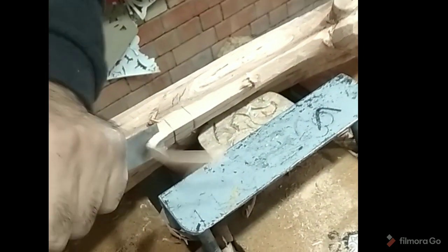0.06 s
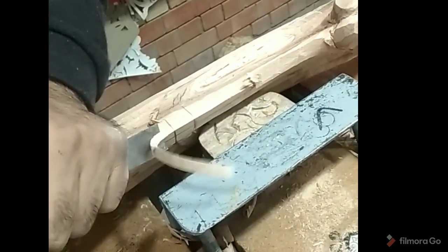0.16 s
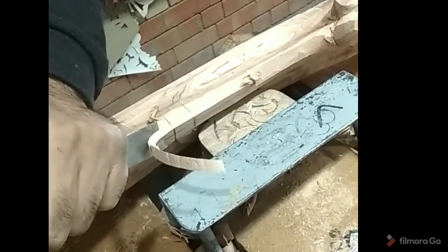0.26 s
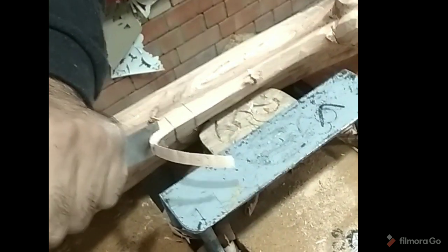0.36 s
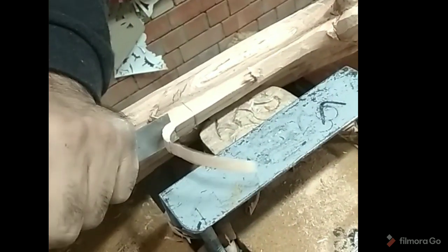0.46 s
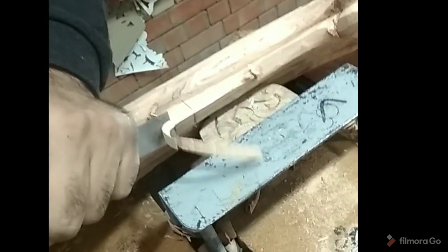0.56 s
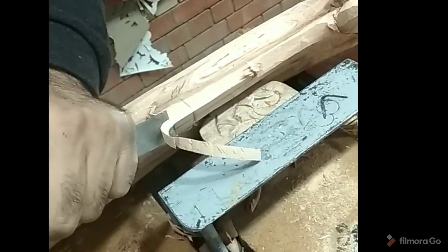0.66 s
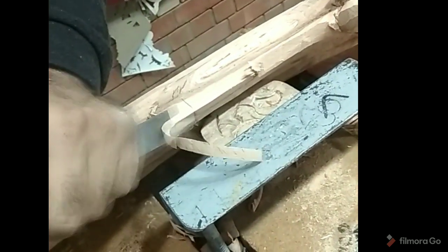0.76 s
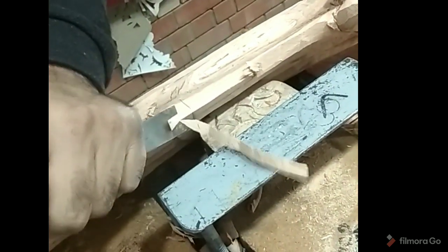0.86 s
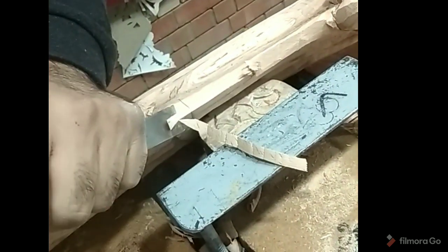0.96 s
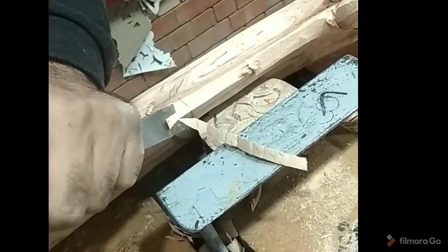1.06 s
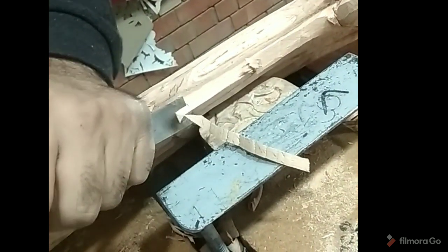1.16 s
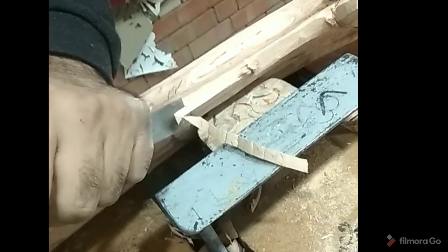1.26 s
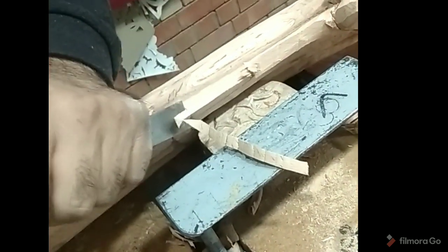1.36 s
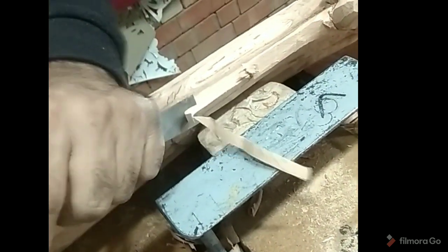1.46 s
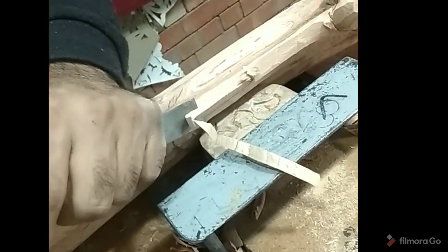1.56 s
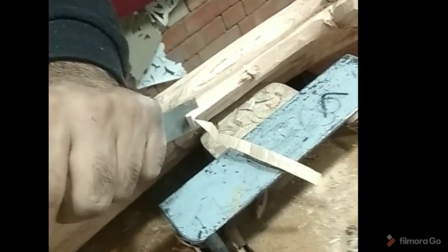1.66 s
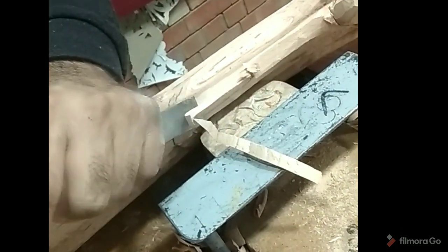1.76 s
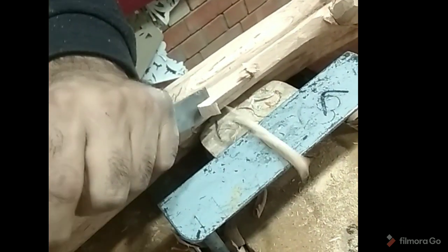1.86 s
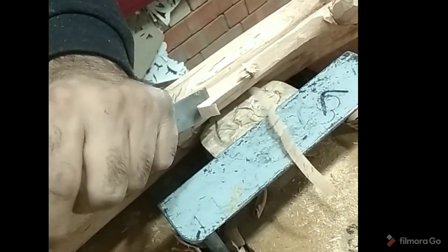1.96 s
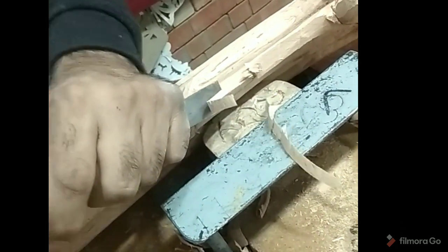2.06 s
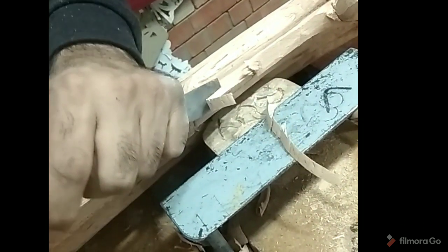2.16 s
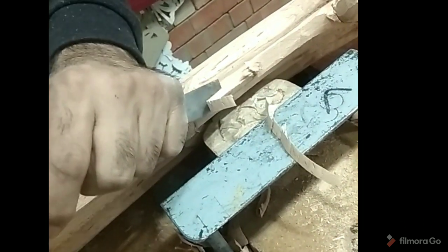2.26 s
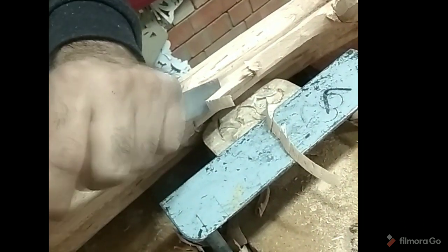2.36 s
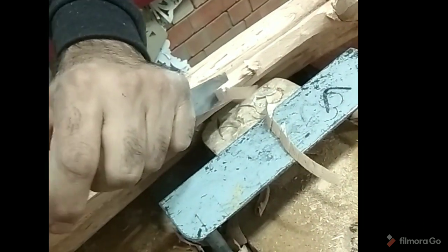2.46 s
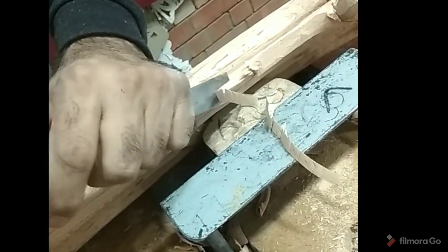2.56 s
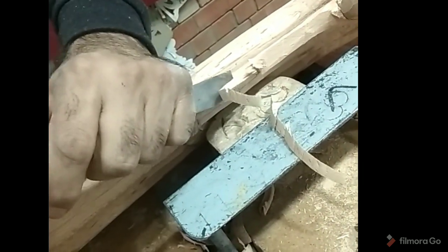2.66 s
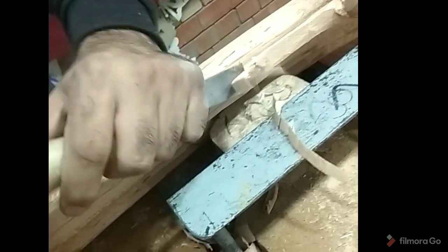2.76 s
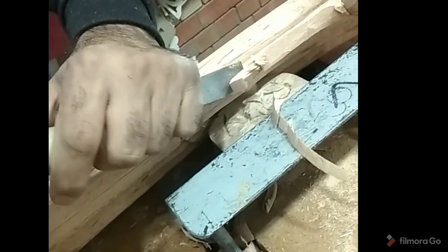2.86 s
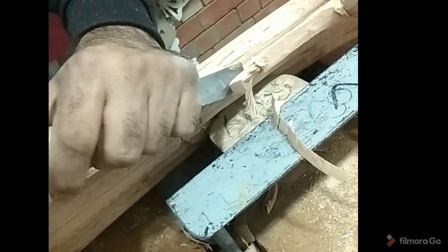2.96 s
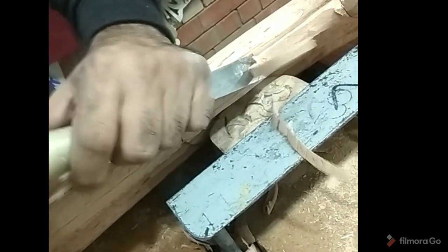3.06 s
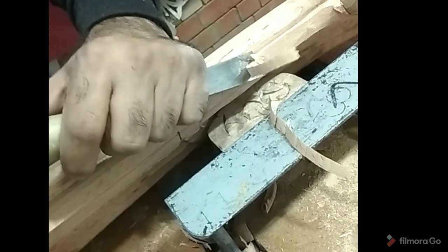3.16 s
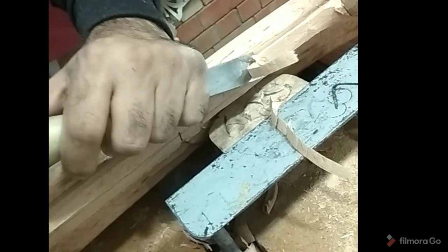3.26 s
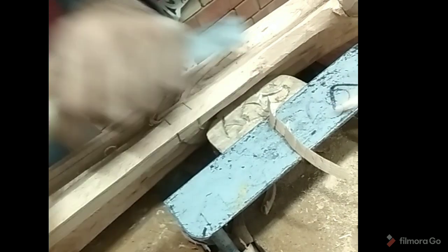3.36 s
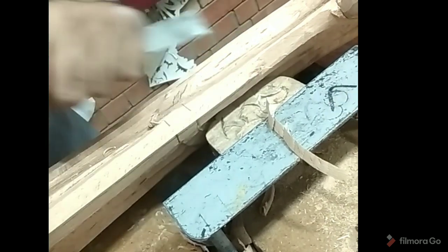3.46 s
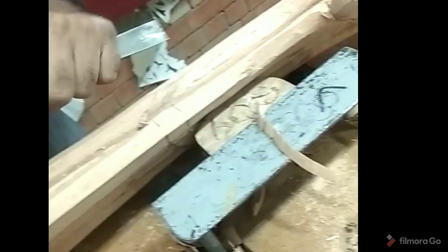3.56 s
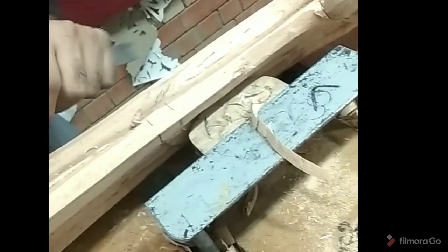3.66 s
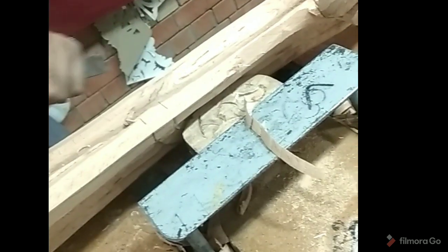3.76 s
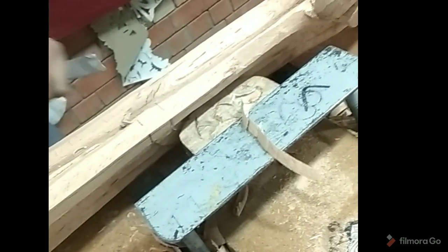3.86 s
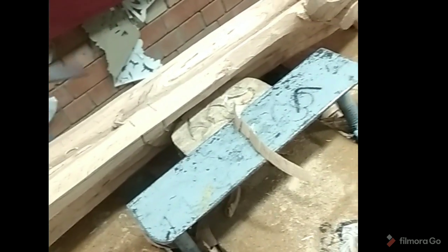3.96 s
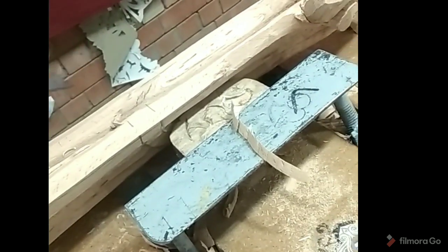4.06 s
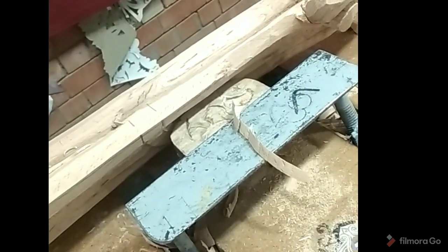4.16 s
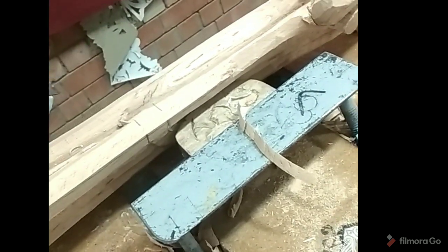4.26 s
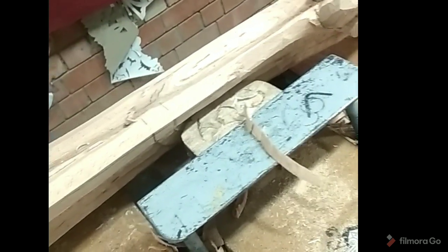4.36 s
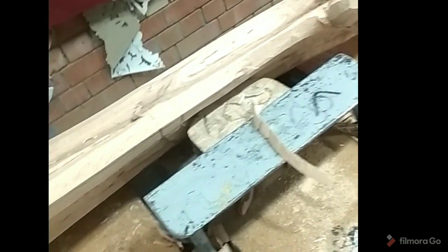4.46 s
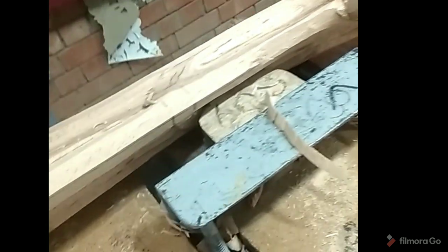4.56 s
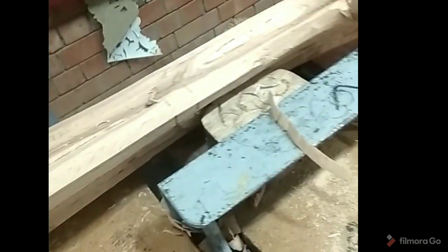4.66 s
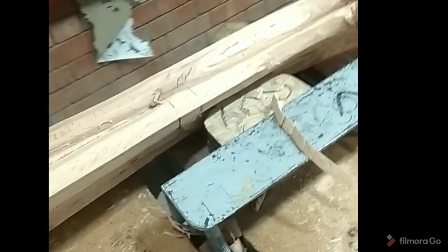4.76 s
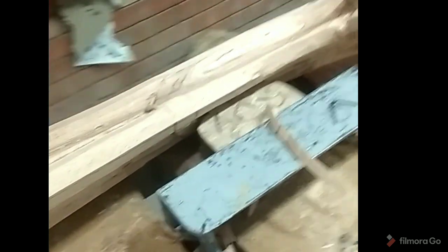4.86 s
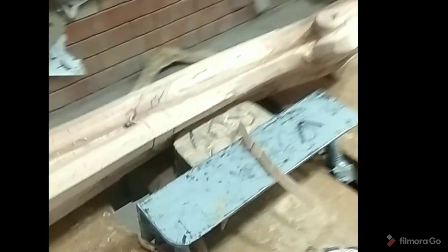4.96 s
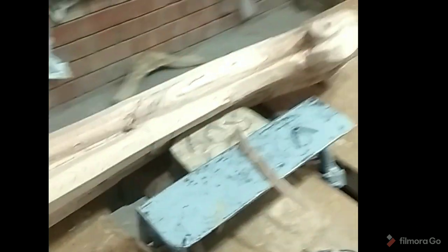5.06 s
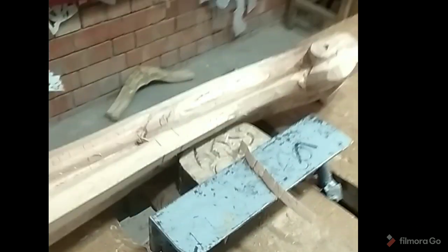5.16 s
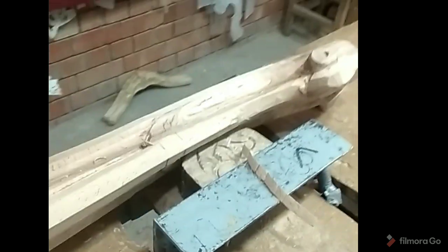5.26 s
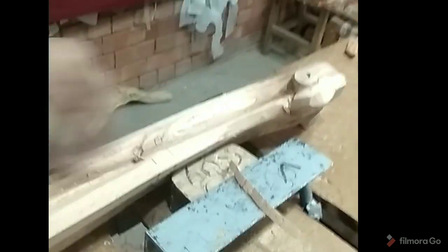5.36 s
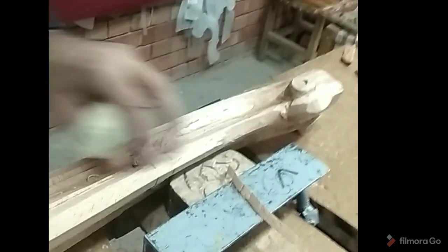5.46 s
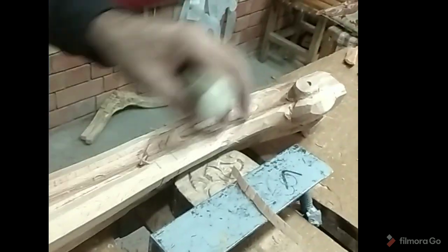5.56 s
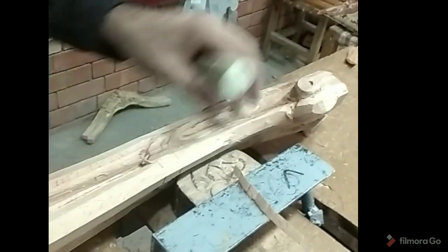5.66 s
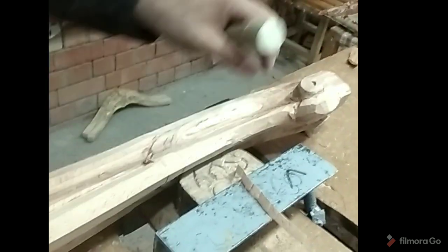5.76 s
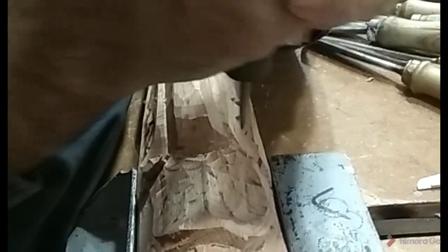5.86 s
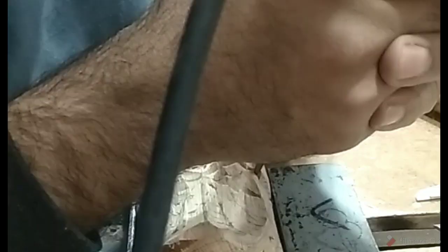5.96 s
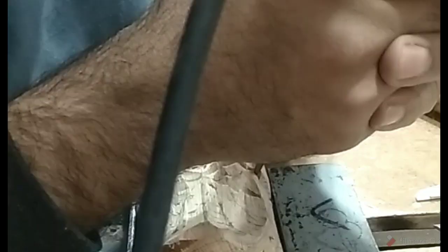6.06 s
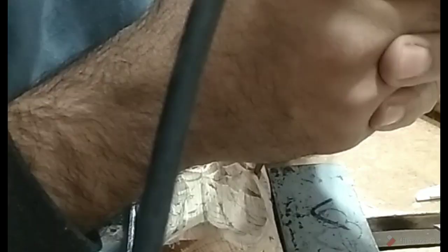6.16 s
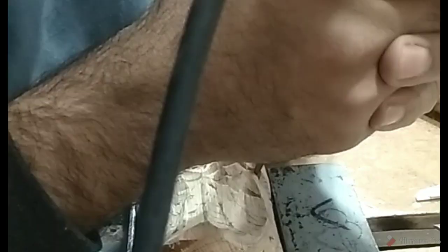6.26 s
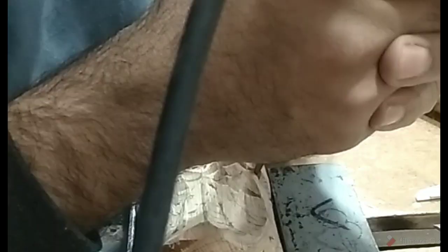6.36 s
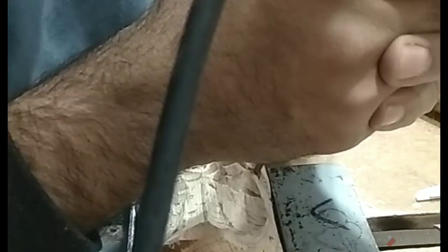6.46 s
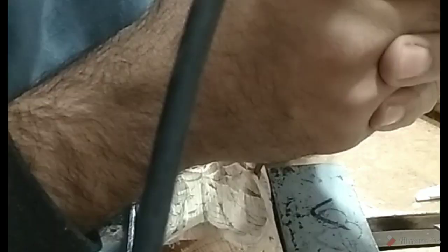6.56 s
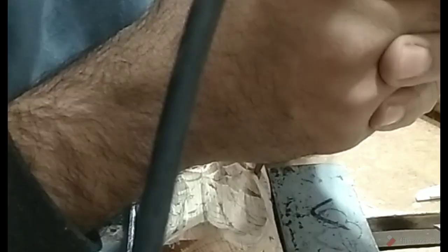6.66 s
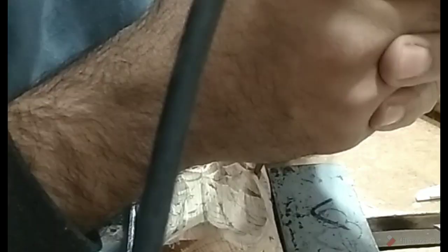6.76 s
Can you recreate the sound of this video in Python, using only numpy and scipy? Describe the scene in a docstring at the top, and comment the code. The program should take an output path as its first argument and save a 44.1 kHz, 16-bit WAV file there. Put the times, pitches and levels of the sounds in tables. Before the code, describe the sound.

Steady woody cracks of mallet on gouge, slowly softening, then quiet handling, a blink of silence, and a hissing, whining rotary tool, left side only.

```python
"""Mallet and gouge, then rotary tool

A mallet drives a gouge along a log: each blow is a burst of decaying log and bench modes, a singing blade,
splintery noise and tearing. Rebounds, bumps, chips, shuffling and cloth surround the blows, over rumble,
hum and hiss. After a short silence a second shot has a rotary tool fading in: shaped noise plus thin tones.
All this is on the left microphone input; the right one holds faint hiss."""
import sys
import numpy as np
from scipy import signal
from scipy.fft import rfft, irfft, next_fast_len
from scipy.io import wavfile
from scipy.ndimage import uniform_filter1d, map_coordinates

SR = 44100
rng = np.random.default_rng(int(sys.argv[2]) if len(sys.argv) > 2 else 0)


def unload_wav(signal):
    """Save mono or channel-first audio to the path in sys.argv[1] as 16-bit WAV at rate SR, clipped to [-1, 1]."""
    wavfile.write(
        sys.argv[1],
        SR,
        np.round(np.clip(np.atleast_2d(signal).T, -1, 1) * 32767).astype(np.int16),
    )


def volts_from_decibels(level):
    """Turn decibel levels (scalar or array-like) into linear amplitude factors."""
    exponent = np.asarray(level, float) / 20
    return 10 ** exponent


N = 300321

# wood fibres tearing, relative spectrum: f/Hz, level/dB
TEAR_SPECTRUM = [(1470, -25.5), (2500, 3), (4550, 0), (7190, -8), (8140, 0.5), (9730, -4), (11400, 0),
                 (16000, -12.5)]
# silence between the two shots: start/s, end/s
GAP_S = (5.872, 5.908)


def unit(x):
    """Scale to rms 1."""
    return x / np.sqrt(np.mean(x ** 2) + 1e-20)


def along(points, hz):
    """Interpolate (f/Hz, value) points on a log frequency axis."""
    f, v = np.transpose(points)
    return np.interp(np.log(hz + 1), np.log(f + 1), v)


def curves(rows):
    """One value per sample for each column after the time."""
    s, *cols = np.transpose(rows)
    return [np.interp(np.arange(N) / SR, s, c) for c in cols]


def wobble(rate_hz):
    """Smooth random curve through rate_hz random knots a second."""
    knots = rng.standard_normal(int(N * rate_hz / SR) + 4)
    return map_coordinates(knots, [np.arange(N) * rate_hz / SR])


def filtered(x, response):
    """Multiply the spectrum of x by a response of frequency."""
    m = next_fast_len(len(x) + 8192)
    return irfft(rfft(x, m) * response(np.fft.rfftfreq(m, 1 / SR)), m)[:len(x)]


def noise(spectrum, size=N, patchy_db=0):
    """Coloured noise of rms 1 with time-frequency patches of random gain."""
    z = signal.stft(rng.standard_normal(size), nperseg=512)[2]
    field = uniform_filter1d(rng.standard_normal(z.shape), size=5, axis=0)
    field = uniform_filter1d(field, size=16, axis=1)
    x = signal.istft(z * volts_from_decibels(patchy_db * unit(field)), nperseg=512)[1][:size]
    return unit(filtered(x, lambda hz: volts_from_decibels(along(spectrum, hz))))


def add(out, s, x):
    """Mix x into out from time s."""
    out[round(s * SR):][:len(x)] += x


def room_hiss():
    """Faint, nearly even noise under the first shot."""
    # relative spectrum: f/Hz, level/dB
    air = [(1500, -44.5), (2500, -4.5), (5000, 0), (10000, -5), (13000, -14), (16000, -25.5)]
    return volts_from_decibels(-74.5 + 0.67 * wobble(3)) * noise(air, patchy_db=0.5)


def hum():
    """Steady sine whose level wavers slightly."""
    # tone: f/Hz, mean level/dB
    tone = [(296.1, -59.5)]
    t = np.arange(N) / SR
    return sum(volts_from_decibels(db + 1.5 * wobble(5.5)) * np.sin(2 * np.pi * hz * t) for hz, db in tone)


def rumble():
    """Low room and handling noise: dark noise on a slow level curve."""
    # mean course: t/s, level/dB
    course = [(0, -47), (1.2, -52), (2, -48), (3.3, -49), (4, -52), (4.85, -57), (5.15, -54), (5.5, -52),
              (5.86, -55)]
    # relative spectrum: f/Hz, level/dB
    low = [(15, -6), (40, -5.5), (100, -2), (180, -4), (230, -9), (340, -10.5), (420, -17), (600, -27),
           (1100, -79)]
    return volts_from_decibels(curves(course)[0] + 1.2 * wobble(7)) * noise(low, patchy_db=1.5)


def shuffle():
    """Moving about: mid-band noise on a level curve."""
    # mean course: t/s, level/dB
    course = [(3.5, -59), (3.76, -60), (3.91, -65.5), (4.86, -71), (5.23, -62.5), (5.36, -58),
              (5.75, -68.5), (5.86, -60)]
    # relative spectrum: f/Hz, level/dB
    mid = [(240, -33.5), (400, -12.5), (971, -9.5), (1040, -11), (2120, -15.5), (4000, -23), (5200, -60.5),
           (8800, -120)]
    return volts_from_decibels(curves(course)[0] + .6 * wobble(25)) * noise(mid, patchy_db=1.2)


def sleeve():
    """Cloth friction: treble noise in short swells over a faint rustle."""
    # swells: middle t/s, length/s, level/dB
    rustles = [(3.612, .06, -82), (3.758, 0.053, -72), (3.98, .12, -68), (4.13, 0.064, -67),
               (4.898, .11, -71.5), (5.017, 0.037, -74), (5.21, 0.065, -71), (5.285, 0.057, -64),
               (5.398, .08, -69), (5.49, .06, -65.5), (5.644, .11, -67)]
    # relative spectrum: f/Hz, level/dB
    high = [(1800, -24), (3500, -0.5), (6000, -7), (10000, -3.5), (14000, -5.5), (16000, -13)]
    rest_db = -81.5
    t = np.arange(N) / SR
    swells = sum(volts_from_decibels(db) * np.exp(-(2 * (t - s) / length) ** 2) for s, length, db in rustles)
    return (swells + volts_from_decibels(rest_db)) * volts_from_decibels(2.2 * wobble(69)) * noise(high, patchy_db=1.0)


def workshop():
    """Everything under the carving, summed."""
    return rumble() + hum() + shuffle() + sleeve() + room_hiss()


def air_rush():
    """Air and brush noise through housing resonances, plus a reflection off the bench."""
    # cooling air and brushes, relative spectrum: f/Hz, level/dB
    rush_spectrum = [(12, -52), (20, -23), (224, -21.5), (966, -5.5), (1210, -9.5), (1350, -10.5),
                     (3230, -2.5), (4160, -8), (5830, -2.5), (11500, -5), (15200, -17), (16500, -46)]
    # housing resonances and dips: f/Hz, width/Hz, level/dB
    housing = [(1060, 59, 2), (1366, 86, 11), (3180, 89, 4), (3934, 230, -9.5), (4900, 450, 5),
               (6550, 175, -12), (7465, 400, -2), (8630, 220, -9.5), (10800, 330, 5), (11340, 230, 5)]
    echo_db, echo_s, echo_sway_s = -15.5, 0.0012, .00006

    def resonances(hz):
        return volts_from_decibels(sum(db * np.exp(-((hz - c) / w) ** 2) for c, w, db in housing))

    rush = volts_from_decibels(0.65 * wobble(250)) * noise(rush_spectrum, patchy_db=1.5)
    rush = unit(filtered(rush, resonances))
    # the echo delay sways with the hand
    late = np.arange(N) - SR * (echo_s + echo_sway_s * wobble(2.8))
    return unit(rush + volts_from_decibels(echo_db) * map_coordinates(rush, [late]))


def shaft_whine():
    """Thin unsteady tones at multiples of a slightly drifting shaft speed."""
    # tones: multiple of the shaft speed, mean level re rush/dB
    harmonics = [(1, -21.5), (3, -23), (4, -15), (5, -21), (6, -10.5), (8, -29), (12, -16)]
    shaft_hz = 990.55  # nominal
    waver = wobble(12)
    clock = np.cumsum(1 + .0004 * wobble(6)) / SR
    tones = np.zeros(N)
    for k, db in harmonics:
        level = volts_from_decibels(db + 1.7 * np.roll(waver, k * SR // 2))
        tones += level * np.sin(2 * np.pi * k * shaft_hz * clock)
    return tones


def rotary_tool():
    """Rush plus whine under a fade-in linear in amplitude."""
    tool_db, start_s, fade_in_s = -18.5, 5.862, 0.26
    fade = np.clip((np.arange(N) / SR - start_s) / fade_in_s, 0, 1)
    return volts_from_decibels(tool_db) * fade * (air_rush() + shaft_whine())


def shop(x):
    """Convolve with a fresh noise tail in which each frequency dies at its own speed."""
    # reverberation: f/Hz, t60/s
    decay = [(100, 0.35), (300, 0.71), (1000, 0.75), (3000, 0.42), (5000, 0.47), (7000, 0.27),
             (12000, 0.17)]
    hz, t, z = signal.stft(rng.standard_normal(SR * 3 // 4), SR, nperseg=256)
    tail = signal.istft(z * volts_from_decibels(-60 * t / along(decay, hz)[:, None]), SR, nperseg=256)[1]
    return signal.fftconvolve(np.pad(x, (300, 0)), tail / np.linalg.norm(tail))


def ringing(modes, t, attack_s, damping, rough_db):
    """Decaying modes at random strength and detuning, each fluttering as loose wood does."""
    hz, db, t60 = np.transpose(modes)[:, :, None]
    strength_db = 1.5 * rng.standard_normal((len(modes), 1))
    detune = .012 * rng.standard_normal((len(modes), 1))
    flutter = uniform_filter1d(rng.standard_normal((len(modes), len(t))), size=160, axis=1)
    flutter_db = rough_db * unit(flutter) * np.clip(t / 0.0054, 0, 1)
    fade = volts_from_decibels(db + strength_db + flutter_db - 60 * t / (t60 * damping))
    tones = fade * np.sin(2 * np.pi * hz * (1 + detune) * t)
    return np.sum(tones, axis=0) * (1 - np.exp(-t / attack_s))


def favour(modes, place_hz, focus_db):
    """The spot struck favours modes near place_hz: focus_db lost per octave squared."""
    return [(hz, db - focus_db * np.log2(hz / place_hz) ** 2, t60) for hz, db, t60 in modes]


def blade(t, start_hz, end_hz, glide_s, held_s):
    """The gouge sings as it slides in, its pitch sagging, and stops once the wood grips it."""
    hz = end_hz + (start_hz - end_hz) * np.exp(-t / glide_s)
    fade = np.clip(t / 0.0022, 0, 1) * volts_from_decibels(-60 * t / .25) * np.clip((held_s - t) / 0.027, 0, 1)
    return fade * np.sin(2 * np.pi * np.cumsum(hz) / SR)


def uneven(size, spread_db, smooth):
    """Random gain of rms 1: wood and fibres give way unevenly."""
    return unit(volts_from_decibels(spread_db * unit(uniform_filter1d(rng.standard_normal(size), size=smooth))))


def splinters(t, attack_s, t60_s):
    """The wood splits in uneven cracks: decaying noise of ragged gain."""
    # relative spectrum: f/Hz, level/dB
    splinter_spectrum = [(180, -48), (300, -13), (678, -4), (915, -0.5), (1390, 1), (2070, -0.5),
                         (2980, -13), (4020, -12.5), (5080, -18), (16000, -44.5)]
    burst = uneven(len(t), 3.77, 110) * noise(splinter_spectrum, size=len(t))
    return volts_from_decibels(-60 * t / t60_s) * burst * (1 - np.exp(-t / attack_s))


def tearing(t, delay_s):
    """A shaving tears: a short stretch of noise as fibres snap unevenly."""
    sliding = np.clip((t - delay_s) / .004, 0, 1) * np.clip((delay_s + 0.035 - t) / 0.021, 0, 1)
    return sliding * uneven(len(t), 4, 60) * noise(TEAR_SPECTRUM, size=len(t), patchy_db=2)


def jolt(t, shake_db, push_db):
    """Low shaking through the bench; the microphone is pushed off centre and drifts back."""
    # relative spectrum of the shaking: f/Hz, level/dB
    shake_spectrum = [(10, -10), (30, 3.5), (60, -5.5), (130, -2.5), (250, -41)]
    onset = 1 - np.exp(-t / 0.0036)
    shake = volts_from_decibels(shake_db - 60 * t / 0.42) * noise(shake_spectrum, size=len(t))
    push = volts_from_decibels(push_db) * np.exp(-t / .08) * (1 - t / t[-1])
    return onset * (shake + push)


def contact(attack_s, damping, ring_hz, focus_db, bench_hz, bench_focus_db, ring_db, splinter_db,
            splinter_t60_s, thud_db, thud_attack_s, crack_db, tear_db, tear_delay_s, blade_db,
            jolt_db, push_db, wet_db):
    """One contact: log and bench modes, blade, splitting, crack and tearing, their reverberation, a jolt."""
    # log and gouge modes before favouring and damping: f/Hz, level/dB, t60/s
    log_modes = [(600, -18, 0.043), (730, -16.5, 0.079), (860, -13, 0.15), (1063, -5, 0.072),
                 (1300, -11, 0.027), (1495, -9.5, 0.08), (1642, -5, 0.093), (1800, -4.5, 0.022),
                 (1997, -4.5, 0.1), (2106, -3, 0.066), (2380, -1, 0.048), (2431, -8.5, 0.052),
                 (2750, -8.5, 0.024), (3400, -19, .05), (3730, -12.5, 0.032), (4010, -3.5, .028),
                 (4327, -3, 0.035), (4850, -8, .03), (6130, -13, .04), (8600, -27, 0.075)]
    # bench top modes before favouring and damping: f/Hz, level/dB, t60/s
    bench_modes = [(107, -9.5, 0.36), (138, -2.5, 0.38), (199.7, -2.5, 0.35), (253.7, -2, 0.25),
                   (300, -1.5, 0.22), (354.8, 2, 0.18), (399, -2, 0.18), (558, -2.5, 0.21)]
    t = np.arange(SR * 3 // 10) / SR
    x = np.zeros(len(t))
    log = favour(log_modes, ring_hz, focus_db)
    add(x, 0, volts_from_decibels(ring_db) * ringing(log, t[:SR // 7], attack_s, damping, rough_db=4.5))
    x += volts_from_decibels(blade_db) * blade(t, start_hz=1165, end_hz=850.0, glide_s=.016, held_s=0.055)
    x += volts_from_decibels(splinter_db) * splinters(t, attack_s, splinter_t60_s)
    bench = favour(bench_modes, bench_hz, bench_focus_db)
    x += volts_from_decibels(thud_db) * ringing(bench, t, thud_attack_s, damping=0.67, rough_db=60 / bench_focus_db)
    x += volts_from_decibels(crack_db - 60 * t / 0.02) * noise(TEAR_SPECTRUM, size=len(t))
    x += volts_from_decibels(tear_db) * tearing(t, tear_delay_s)
    out = volts_from_decibels(wet_db) * shop(x)
    out[:len(x)] += x + jolt(t, jolt_db, push_db)  # the jolt gets no reverberation
    return out


def knock(db, thud_db, scuff_db, bench_hz, ring_hz, thud_attack_s, bench_focus_db, wet_db):
    """Wood meets bench: gentle knocks start softer and ring longer and purer, hard ones splinter."""
    return volts_from_decibels(db) * contact(
        .0007 - .0001 * db, .3 - 0.02 * db, ring_hz, 8 - 0.88 * db, bench_hz, bench_focus_db,
        ring_db=-3.0, splinter_db=0.24 * db - 4, splinter_t60_s=0.16,
        thud_db=thud_db, thud_attack_s=thud_attack_s, crack_db=scuff_db - 2,
        tear_db=scuff_db, tear_delay_s=.008, blade_db=-np.inf,
        jolt_db=-23.5, push_db=-45.5, wet_db=wet_db)


def chips(out):
    """Tiny chips snap or land: noise with a fast decay and a weak slower one."""
    # chips: t/s, level/dB
    chip_events = [(0.952, -38), (0.9732, -40), (1.3724, -33), (2.6304, -53), (3.3505, -47.5), (3.735, -51),
                   (3.8152, -55), (3.9559, -51.5), (5.8092, -62)]
    t = np.arange(SR // 20) / SR
    fade = volts_from_decibels(-60 * t / 0.0063) + volts_from_decibels(-21 - 60 * t / 0.16)
    for s, db in chip_events:
        add(out, s, volts_from_decibels(db) * fade * noise(TEAR_SPECTRUM, size=len(t)))


def bumps(out):
    """Tools set down or bumped: knocks with narrowly favoured bench modes."""
    # bumps: t/s, force/dB, bench thud re force/dB, favoured bench f/Hz, favoured ring f/Hz
    bump_events = [(3.586, -35, 6, 200, 2110), (3.668, -44, -8, 200, 2380), (3.716, -39.5, -1, 195, 2070),
                   (3.728, -38.5, 7.5, 195, 2040), (3.892, -45.5, -0.5, 116, 895),
                   (4.15, -64, 22, 102.5, 2200), (4.794, -49, -9, 200, 1950), (5.267, -40, -12, 345, 1750),
                   (5.279, -30, -5.5, 345, 1133), (5.619, -40.5, -16, 310, 1350)]
    for s, db, thud_db, bench_hz, ring_hz in bump_events:
        add(out, s, knock(db, thud_db, -33, bench_hz, ring_hz,
                          thud_attack_s=0.0073, bench_focus_db=44, wet_db=-12))


def rebounds(out):
    """The log rebounds on the bench: knocks with a common favoured ring pitch."""
    # rebounds: t/s, force/dB, bench thud re force/dB, scuff re force/dB, favoured bench f/Hz
    rebound_events = [(.002, -18.5, -5.5, -24, 300), (.254, -13.5, -12.5, -22, 202),
                      (.265, -16, -2.5, -21, 300), (1.608, -7.5, -12, -21.5, 300),
                      (1.889, -12.5, 0.5, -11.5, 275), (2.178, -15.5, -7, -22, 270),
                      (2.526, -21.5, -4.5, -17, 324), (2.905, -14, -4.5, -26.5, 221),
                      (3.153, -19, -1, -19, 207)]
    for s, db, thud_db, scuff_db, bench_hz in rebound_events:
        add(out, s, knock(db, thud_db, scuff_db, bench_hz, ring_hz=1390,
                          thud_attack_s=.004, bench_focus_db=16.5, wet_db=-9.0))


def glancing_blow(out):
    """The last blow glances off, short and bright."""
    # blow: t/s, force/dB, favoured ring f/Hz
    s, db, ring_hz = (3.423, -7.5, 3170)
    add(out, s, volts_from_decibels(db) * contact(
        0.00019, 0.29, ring_hz, focus_db=9.5, bench_hz=210.3, bench_focus_db=15,
        ring_db=-6.0, splinter_db=-17.5, splinter_t60_s=.05, thud_db=-30, thud_attack_s=.002,
        crack_db=-17, tear_db=-43, tear_delay_s=.01, blade_db=-27,
        jolt_db=-42, push_db=-33, wet_db=-16))


def blows(out):
    """Mallet on gouge: lighter blows ring shorter and favour modes near bright_hz more."""
    # blows: t/s, force/dB, then re force: bench thud/dB, steel crack/dB, tearing/dB
    blow_events = [(.195, -4, -30.5, -14, -39), (.527, -4, -31, -9.5, -40.5),
                   (.868, -4.5, -30.5, -9, -37.5), (1.204, -5, -25.5, -14, -29.5),
                   (1.537, -5, -27.5, -6.5, -40.5), (1.877, -7, -19.5, -10.5, -33),
                   (2.195, -6, -19, -10, -24), (2.51, -8.5, -18, -11.5, -35), (2.838, -9, -16, -7.5, -29),
                   (3.14, -12, -29, -15.5, -34)]
    full_ring, ring_per_db = 0.65, 0.03  # ring time share at 0 dB force, change per dB of force
    bright_hz, bright_per_db = 3000, 0.48  # dB per octave squared for each dB less force
    for s, db, thud_db, crack_db, tear_db in blow_events:
        ring = full_ring + ring_per_db * db
        add(out, s, volts_from_decibels(db) * contact(
            0.00018, ring, bright_hz, focus_db=-bright_per_db * db, bench_hz=300, bench_focus_db=15,
            ring_db=-5.5, splinter_db=-5, splinter_t60_s=.12 * ring,
            thud_db=thud_db, thud_attack_s=0.0015, crack_db=crack_db,
            tear_db=tear_db, tear_delay_s=0.012, blade_db=-11 + .6 * db,
            jolt_db=-29.5, push_db=-23.0, wet_db=-14.5))


def carving():
    """Chips, bumps, rebounds and mallet blows on one track."""
    out = np.zeros(N + 2 * SR)  # room for tails
    chips(out)
    bumps(out)
    rebounds(out)
    glancing_blow(out)
    blows(out)
    return out[:N]


def scene():
    """Two shots, one after the other, on the left input."""
    t = np.arange(N) / SR
    first = np.clip((GAP_S[0] - t) / 0.0026, 0, 1) * (carving() + workshop())
    second = np.clip((t - GAP_S[1]) / 0.0073, 0, 1) * rotary_tool()
    return np.array([first + second, np.zeros(N)])


def idle_input():
    """Hiss of the right input, absent in the gap between the shots."""
    # relative spectrum: f/Hz, level/dB
    hiss_spectrum = [(10, 14), (30, 7), (150, -7.5), (500, -19.5), (2000, -28), (5000, -24.5), (10000, -33),
                     (16000, -42.5)]
    t = np.arange(N) / SR
    return volts_from_decibels(-64) * noise(hiss_spectrum) * ((t < GAP_S[0]) | (t > GAP_S[1]))


def roll_off(x):
    """The treble ends steeply here."""
    return signal.sosfilt(signal.butter(12, 16780, fs=SR, output="sos"), x)


def record(dry):
    """Left input amplified, softly clipped and band-limited; right input holds only its own hiss."""
    raw = volts_from_decibels(6.5) * dry[0]
    left = raw / (1 + np.abs(raw / .93) ** 8) ** (1 / 8)
    band_limit = [(15600, -0.5), (15900, -29.0), (17000, -48.5)]  # f/Hz, level/dB
    left = filtered(left, lambda hz: volts_from_decibels(along(band_limit, hz)))
    return roll_off(np.array([left, idle_input()]))


dry = scene()
out = record(dry)
unload_wav(out)
```